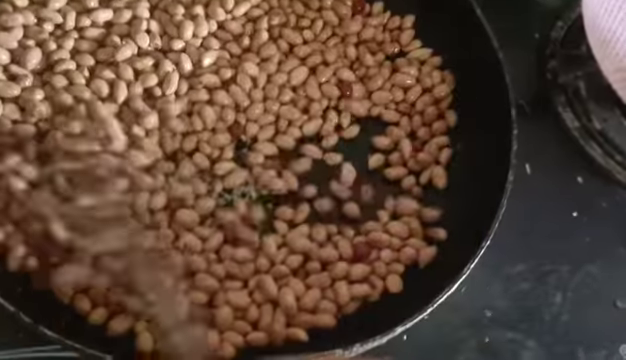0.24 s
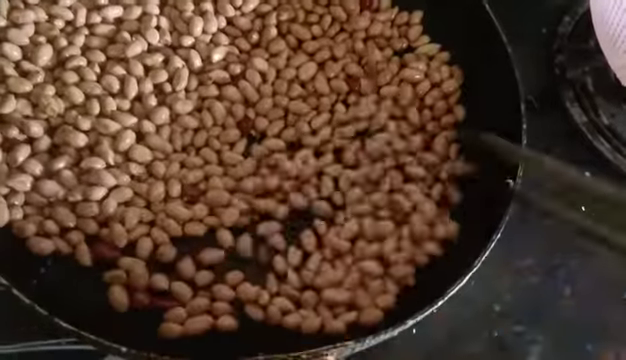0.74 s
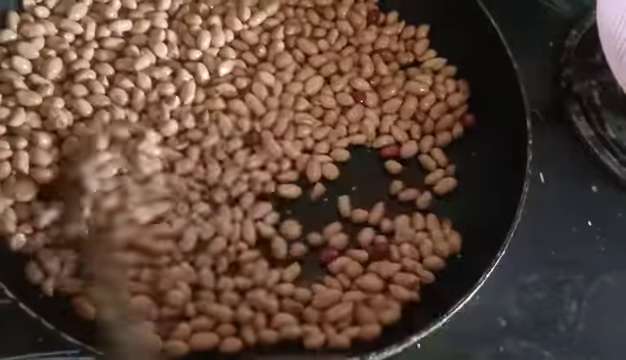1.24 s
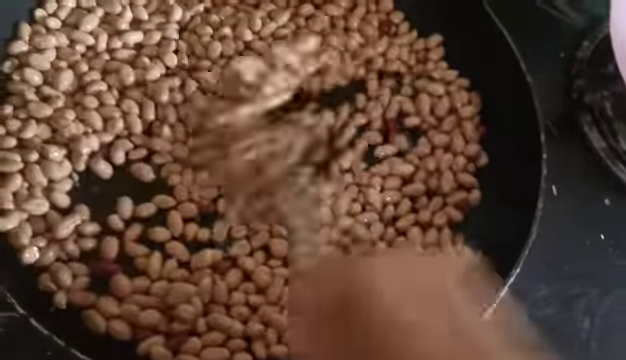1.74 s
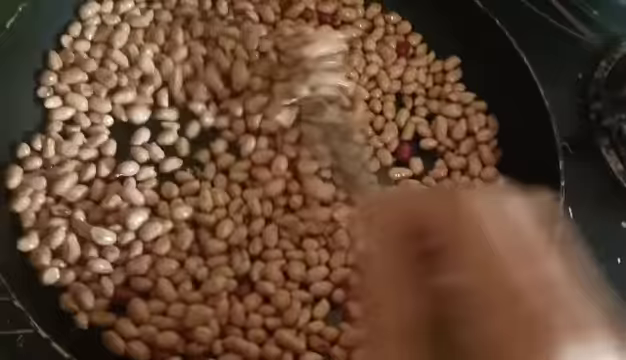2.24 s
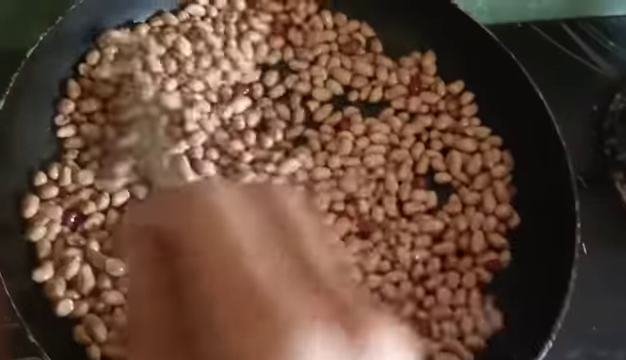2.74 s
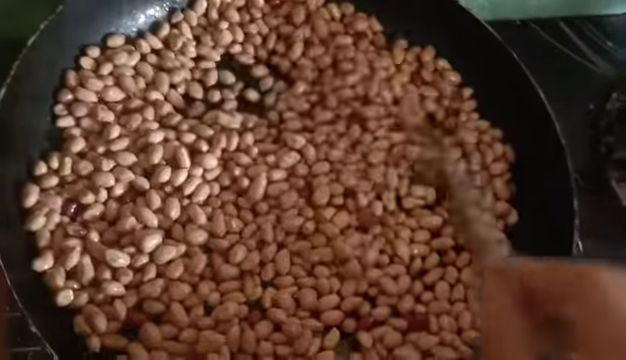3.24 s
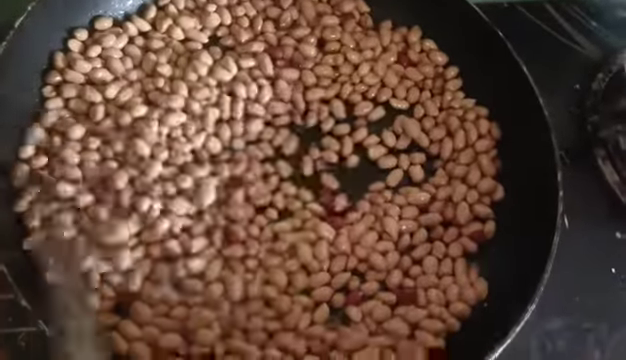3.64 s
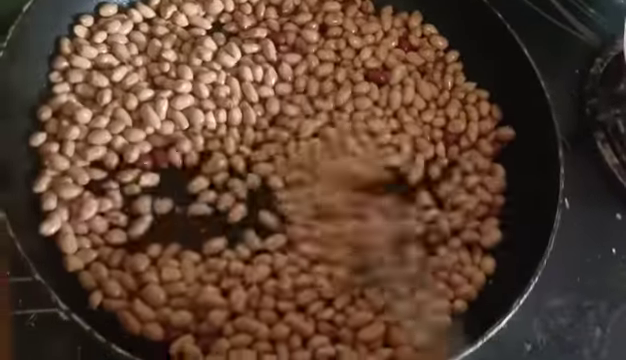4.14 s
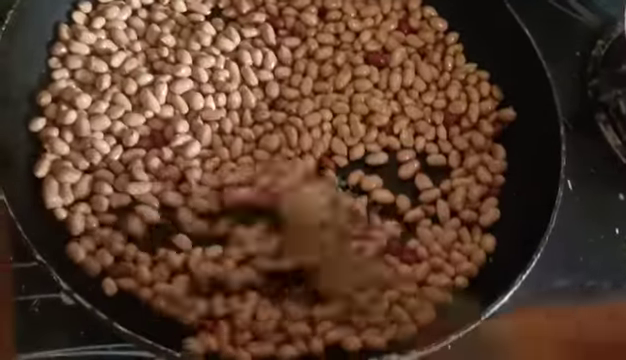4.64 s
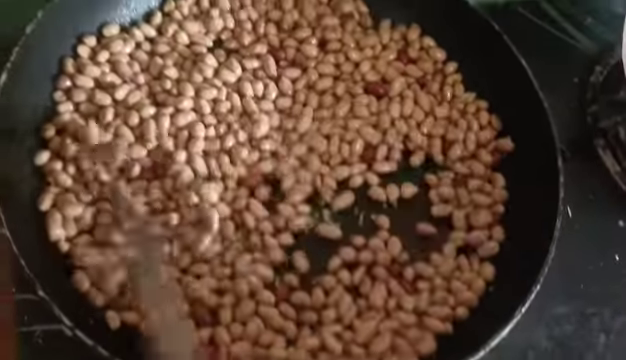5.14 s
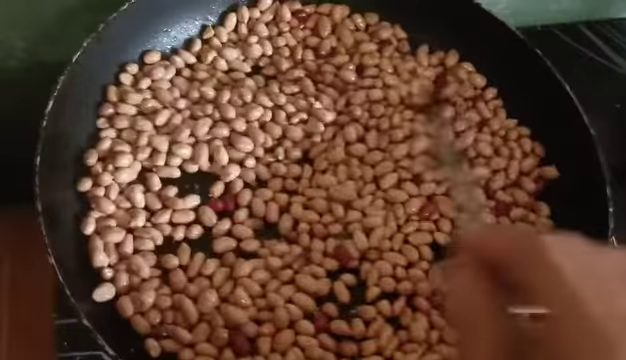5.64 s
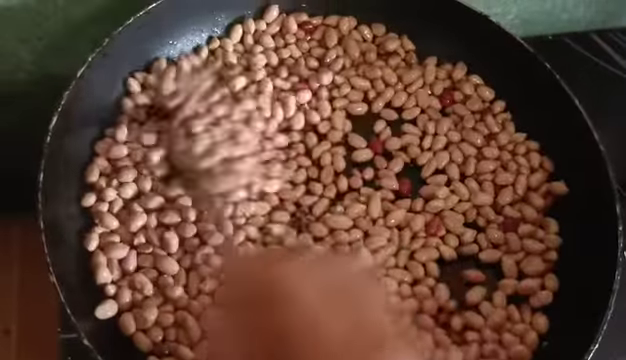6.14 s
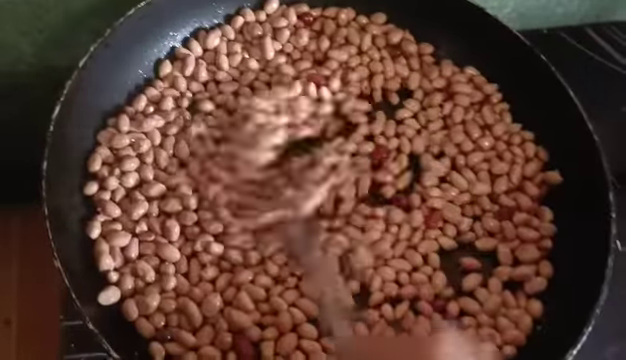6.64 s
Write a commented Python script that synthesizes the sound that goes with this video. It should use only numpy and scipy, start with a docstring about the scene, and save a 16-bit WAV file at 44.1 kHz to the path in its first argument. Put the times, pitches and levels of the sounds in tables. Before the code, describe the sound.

From the start, a metal spatula stirs peanuts in a hot frying pan, close up in a small kitchen with little echo. The sweeps come two or three times a second and last through all seven seconds. Each is a surge of dry, hollow rattling with a thin metallic scrape and a brief ring from the pan. The blade knocks irregularly, most clearly around 0.7, 1.3, 1.6, 3.3, 5 and 5.7 seconds, and the pan sometimes shifts on its stand with a low thump. Sharp, bright clicks stand out near 0.7, 2.6, 3, 4.2 and 5.3 seconds. Single nuts drop on bare metal with small taps, the clearest at about 3.6 seconds. Underneath, hot skins crackle over a faint, steady high sizzle, a little stronger after 2 seconds, and the burner keeps up a soft low rumble.

```python
"""Peanuts dry-roasting in a frying pan in a small kitchen, with a stereo microphone close by.
From the start the burner rumbles below, a metal spatula sweeps through the nuts and hot skins crackle.
With each sweep, two or three a second, the nuts tumble, the blade scrapes and the pan rings under them.
Soon there is a sharp click, a loose nut drops on bare metal, the blade knocks and the pan shifts
on its stand; all of these come back irregularly as the stirring goes on."""
import sys
import numpy as np
from scipy import signal
from scipy.fft import rfft, irfft
from scipy.io import wavfile
from scipy.ndimage import uniform_filter1d

SR = 44100
rng = np.random.default_rng(int(sys.argv[2]) if len(sys.argv) > 2 else 0)


def transcribe(signal):
    """Save signal, clipped to [-1, 1], as a 16-bit WAV file at the path in sys.argv[1]."""
    frames = np.atleast_2d(signal).T
    limited = np.clip(frames, -1, 1)
    pcm = np.round(limited * 32767).astype(np.int16)
    wavfile.write(sys.argv[1], SR, pcm)


N = 303136


def from_db(db):
    """Decibels to gain."""
    return 10 ** (np.asarray(db) / 20)


def rms_one(x):
    """Scale a stereo pair so that its centre has rms 1."""
    return x / np.sqrt(np.mean(x.mean(0) ** 2) + 1e-20)


def smooth(x, span_s):
    """A moving average, taken twice."""
    for _ in range(2):
        x = uniform_filter1d(x, int(span_s * SR) + 1)
    return x


def steady(x, even_s):
    """Hold the centre at rms 1 over spans longer than a single contact."""
    return x / np.sqrt(np.abs(smooth(x.mean(0) ** 2, even_s)) + 1e-20)


def in_time(rows):
    """A curve of (seconds, value) points at every sample."""
    return np.interp(np.arange(N) / SR, *np.transpose(rows))


def at_hz(points, hz):
    """Read a spectrum on a log-frequency axis."""
    f, value = np.transpose(points)
    return np.interp(np.log(np.maximum(hz, 1)), np.log(f), value)


def convolve(x, response):
    """Filter both sides, keeping the length."""
    return signal.oaconvolve(x, np.atleast_2d(response), axes=1)[:, :N]


def causal(spectrum, size=4096):
    """The minimum-phase impulse response of a spectrum: nothing sounds early."""
    hz = np.arange(size // 2 + 1) * SR / size
    cepstrum = irfft(np.log(from_db(at_hz(spectrum, hz))))
    cepstrum[1:size // 2] *= 2
    cepstrum[size // 2 + 1:] = 0
    return irfft(np.exp(rfft(cepstrum)))


def resonate(x, hz, width_hz):
    """A resonance with gain 1 on top."""
    r = np.exp(-np.pi * width_hz / SR)
    feedback = [1, -2 * r * np.cos(2 * np.pi * hz / SR), r * r]
    return signal.lfilter(np.array([1, 0, -1]) * (1 - r * r) / 2, feedback, x)


def at_random(per_s):
    """Moments in seconds, coming at a rate that may change."""
    return np.flatnonzero(rng.random(N) < per_s / SR) / SR


def contacts(per_s, spread_db, even_s):
    """Samples and sizes of random contacts, many small and a few large, their slow level evened out."""
    at = np.flatnonzero(rng.random(N) < per_s / SR)
    sizes = from_db(spread_db * np.minimum(rng.exponential(1, N), 4.5))[at]
    energy = smooth(np.bincount(at, sizes ** 2, N), even_s)
    return at, sizes / np.sqrt(energy[at])


def swells(starts, rises_s, lengths, peaks_db, settle_s, rest_db):
    """Level in dB of movements that rise, hold and settle; rise and settling times span 20 dB."""
    t, power = np.arange(N) / SR, from_db(rest_db) ** 2 * np.ones(N)
    for s, rise_s, length, db in np.broadcast(starts, rises_s, lengths, peaks_db):
        near = slice(max(int((s - 2 * rise_s) * SR), 0), int((s + length + 2 * settle_s) * SR))
        away = np.maximum(s - t[near], 0) / rise_s + np.maximum(t[near] - s - length, 0) / settle_s
        power[near] += from_db(db - 20 * away ** 1.35) ** 2  # round at the top, steep at the feet
    return 10 * np.log10(power)


# How alike the microphone's two sides are. Each row: frequency in Hz, likeness from 0 to 1.
STEREO_LIKENESS = [(100, .93), (400, 1), (600, 0.65), (800, 0), (1050, 1), (1500, 0), (2000, 0.52),
                   (3000, 0), (8000, 0.06)]
SIDES = np.array([[1], [-1]])  # left, right


def two_sides(draws, hz):
    """Mix two unrelated draws into left and right, as alike as they are at this pitch."""
    alike = np.clip(at_hz(STEREO_LIKENESS, hz), 0, 1)
    return np.sqrt(1 + alike) * draws[0] + np.sqrt(1 - alike) * draws[1] * SIDES


def low_noise(spectrum):
    """Stereo noise of a given colour, alike on both sides in the bass; rms 1."""
    bins = two_sides(rfft(rng.standard_normal((2, N))), np.arange(N // 2 + 1) * SR / N)
    return rms_one(convolve(irfft(bins, N), causal(spectrum)))


def strike(at, sizes, width_share, pitched_db, count=44):
    """Every contact rings many short modes and favours a chance few."""
    out, clicks = np.zeros((2, N)), 1e-12 * rng.standard_normal((2, N))
    for hz in np.geomspace(300, 15000, count):
        favour = from_db(pitched_db * np.clip(rng.standard_normal(len(at)), -2, 2))
        clicks[:, at] = sizes * favour * two_sides(rng.standard_normal((2, len(at))), hz)
        out += resonate(clicks, hz, width_share * hz)
    return out


def pings(times, peaks, pitches, t60):
    """One dying sine for each touch, reaching the two sides in different phase."""
    out, t = np.zeros((2, N + SR)), np.arange(int(t60 * SR)) / SR
    dying = from_db(-60 * t / t60)
    apart = (1 - at_hz(STEREO_LIKENESS, pitches)) * rng.uniform(-1.1, 1, len(times))
    for i, peak, hz, phase in zip((times * SR).astype(int), peaks, pitches, apart):
        attack = 1 - np.exp(-2 * hz * t)
        out[:, i:i + len(t)] += peak * attack * dying * np.sin(2 * np.pi * hz * t + phase * SIDES)
    return out[:, :N]


# The burner and the stand, just below the pan. Each row: frequency in Hz, level in dB.
BURNER_SPECTRUM = [(20, -6), (55, -5), (100, -3.5), (200, -9.5), (265, -1), (330, -14.5), (700, -8),
                   (2000, -11), (6000, -21.5)]
STAND_SPECTRUM = [(40, -9), (110, -16.5), (150, 0.5), (190, -7.5), (262, 1), (320, -6.5), (450, 0.5),
                  (800, -15), (2000, -21)]
# Shoves of the pan on its stand. Each row: time in seconds, level in dB.
PAN_SHOVES = [(0.41, -34.5), (2.02, -34.5), (2.42, -36), (3.66, -34), (4.5, -37.5), (6.1, -33.5),
              (6.53, -37)]


def rumbling():
    """The burner runs steadily; the pan grumbles on its stand when shoved."""
    s, shove_db = np.transpose(PAN_SHOVES)
    stand_db = swells(s, rises_s=.11, lengths=.01, peaks_db=shove_db, settle_s=.21, rest_db=-46)
    return from_db(-40) * low_noise(BURNER_SPECTRUM) + from_db(stand_db) * low_noise(STAND_SPECTRUM)


# The blade's sweeps, close to the microphone. Each row: start of full speed, rise and length in seconds;
# tumbling, brightness, brightening during the sweep, crackle of rubbed skins, the pan's low ring,
# its deep hollow tone and left over right, all in relative dB; lower and upper resonance in Hz.
BLADE_SWEEPS = [(0.011, 0.08, 0.078, -15, -1.0, 4.0, -36.0, 3.7, -28.0, -6.0, 1050.0, 1500.0),
                (0.372, 0.022, 0.02, -26.0, -3, -1.0, -31.5, -9.3, -15.0, -5.0, 1000.0, 1600.0),
                (0.492, 0.08, 0.1, -18, -4.5, 3.0, -36.0, -9.3, -21.0, -3.0, 1040.0, 1870.0),
                (0.812, 0.04, 0.088, -18.3, 0.7, -4.0, -32.0, -3.3, -27.0, -6, 1010.0, 1480.0),
                (1.232, 0.06, 0.1, -18.8, 2, 0.0, -30.0, 3.7, -22.0, -6.0, 1120.0, 1736.0),
                (1.645, 0.07, 0.076, -14.5, -1.2, 6.0, -32.0, -2.3, -23.0, -6.0, 1014.0, 1390.0),
                (2.09, 0.07, 0.11, -20.0, -1.2, -1.0, -29.5, 2.7, -23.0, -5.0, 790.0, 1446.0),
                (2.523, 0.08, 0.063, -14.7, -6.5, -1.0, -33.0, 0.7, -17.0, -3, 960.0, 1040.0),
                (2.926, 0.08, 0.068, -14.2, -6.5, 0.0, -28.0, -5.3, -25.0, -2.0, 880.0, 996.0),
                (3.287, 0.08, 0.043, -13.5, -1.5, 1.0, -26.0, -5.3, -13.0, -5.0, 965.0, 1290.0),
                (3.632, 0.022, 0.015, -27.0, 1.5, -3.0, -27.0, 1.7, -22.0, -4.0, 1000.0, 1400.0),
                (3.73, 0.08, 0.063, -16.0, -0.5, 2.0, -40.0, -2.3, -18.0, -4.0, 982.0, 1840.0),
                (4.069, 0.08, 0.07, -16.5, -1.1, -5.0, -28.5, 1.7, -25.0, -4.0, 1085.0, 1424.0),
                (4.537, 0.08, 0.096, -20, -2, 2.0, -37.0, -3.3, -25.0, -5.0, 1070.0, 1300.0),
                (4.874, 0.08, 0.071, -17, -1.5, 3.0, -30.0, -2.3, -26.0, -5.0, 1018.0, 1755.0),
                (5.272, 0.11, 0.124, -20.5, -0.3, 1.0, -31.0, 0.7, -13.0, -4, 1087.0, 1520.0),
                (5.707, 0.08, 0.056, -12.5, -5.5, 2.0, -45.0, 0.7, -14.0, -3.5, 936.0, 1320.0),
                (6.147, 0.08, 0.059, -14.5, -5.0, 2.0, -37.0, 2.7, -13.0, -2.0, 930.0, 1460.0),
                (6.509, 0.08, 0.044, -13.0, -4, 0.0, -32.0, -2.3, -15.0, -2.0, 970.0, 1290.0)]
MEAN_TUMBLE_DB = -18


def stirring():
    """The blade pushes through the heap, each sweep with its own force, colour and place."""
    s, rise_s, length, tumble_db, tone_db, brightening_db = np.transpose(BLADE_SWEEPS)[:6]
    ring_db, depth_db, place_db = map(per_sweep, np.transpose(BLADE_SWEEPS)[7:10])
    # a few nuts still roll in the pauses
    level_db = swells(s, rise_s, length, tumble_db, settle_s=.135, rest_db=-42.5)
    surges = smooth(rng.standard_normal(N), span_s=.04)  # the heap gives way unevenly
    level_db += .4 * surges / surges.std()
    dulling_db = .04 * (level_db - MEAN_TUMBLE_DB)  # a heavy push loads the pan
    bright_db = per_sweep(tone_db, brightening_db) - dulling_db
    stirred = tumbling(level_db, bright_db, ring_db, depth_db) + scraping(level_db, bright_db)
    lean = from_db(.5 * (place_db - place_db.mean()) * SIDES)
    return lean * (stirred + knocking())


def per_sweep(values, change=0):
    """A control that holds or drifts during each sweep and glides to the next in the pause."""
    s, _, length, *_ = np.transpose(BLADE_SWEEPS)
    return in_time(sorted(zip(np.r_[s, s + length], np.r_[values - change / 2, values + change / 2])))


def sweep_resonance(x, pitches, width_hz):
    """A resonance that takes a new pitch with each sweep, changing in the pauses."""
    s, _, length, *_ = np.transpose(BLADE_SWEEPS)
    pauses_s = (s[1:] + (s + length)[:-1]) / 2
    parts = np.split(x, (pauses_s * SR).astype(int), axis=1)
    return np.hstack([resonate(part, hz, width_hz) for part, hz in zip(parts, pitches)])


# Rattling nuts at close range. Each row: frequency in Hz, level in dB.
TUMBLE_SPECTRUM = [(200, -48), (350, -27.5), (500, -18), (700, -13), (1000, -0.5), (1400, 7.5), (1900, -1),
                   (2500, -7.5), (3200, -22.5), (4500, -23.5), (6000, -33.5), (9000, -35), (15000, -42)]


def tumbling(level_db, bright_db, ring_db, depth_db):
    """Nuts hit each other and the pan; a harder sweep makes more contacts and louder ones."""
    start_s, _, length, *_, lower_hz, upper_hz = np.transpose(BLADE_SWEEPS)
    force_db = level_db - MEAN_TUMBLE_DB
    hits = contacts(per_s=1100 * from_db(.5 * force_db), spread_db=3.5, even_s=.13)
    rattle = convolve(strike(*hits, width_share=.05, pitched_db=4), causal(TUMBLE_SPECTRUM))
    rattle = steady(rattle, even_s=.1)
    # nuts that land squarely on bare metal give a short hollow note near the sweep's resonances
    s = at_random(170 * from_db(.3 * force_db))
    lower_at, upper_at = (np.interp(s, start_s + length / 2, hz) for hz in (lower_hz, upper_hz))
    near_hz = np.where(rng.random(len(s)) < .55, lower_at, upper_at)
    peaks = from_db(rng.normal(0, 4.6, len(s)))
    notes = pings(s, peaks, near_hz * 2 ** rng.uniform(-.49, .465, len(s)), t60=.023)
    nuts = pan_rings(rattle + notes, ring_db)
    nuts = (nuts + from_db(-2.5) * sweep_resonance(nuts, lower_hz, width_hz=45)
            + from_db(-4) * sweep_resonance(nuts, upper_hz, width_hz=53))
    crossover = (signal.butter(3, 1250, kind, fs=SR, output="sos") for kind in ("low", "high"))
    body, clatter = (signal.sosfilt(np.vstack([sos, sos]), nuts) for sos in crossover)
    # the duller the sweep, the more the hollow of the pan sounds
    body = body + from_db(13.5 - np.maximum(bright_db, -9)) * resonate(body, hz=827, width_hz=850)
    deep = resonate(resonate(rattle, hz=520, width_hz=220), hz=520, width_hz=220)
    lows = from_db(3.5) * steady(body, even_s=.021) + from_db(depth_db) * steady(deep, even_s=.055)
    return from_db(level_db) * (lows + from_db(bright_db + 3) * steady(clatter, even_s=.048))


# The pan's long rings. Each row: frequency in Hz, gain in dB, time to fall 60 dB in seconds.
PAN_RESONANCES = [(260.6, 11, 0.68), (582, -4, 0.23), (689, 4, 0.5), (730.2, 13, .3), (927, -15, 0.26),
                  (1468, -16, 0.16), (1846, -2.5, 0.33), (2664, 2.5, 0.055), (3305, 11, 0.063)]


def pan_rings(x, low_db):
    """Contacts set the pan ringing; its low modes depend on how the blade bears on it."""
    low = x * from_db(low_db)
    return x + sum(from_db(db) * resonate(low if hz < 800 else x, hz, np.log(1000) / (np.pi * t60))
                   for hz, db, t60 in PAN_RESONANCES)


# Metal dragged over metal, close up. Each row: frequency in Hz, level in dB.
SCRAPE_SPECTRUM = [(2200, -9.5), (3300, 2), (4300, -2.5), (5200, -1.5), (6200, -3), (8000, -9.5),
                   (11000, -13)]


def scraping(level_db, bright_db):
    """The blade drags over the pan in slips, each ringing briefly at a high pitch of its own."""
    s = at_random(650 * from_db(.5 * (level_db - MEAN_TUMBLE_DB)))
    pitches = 2300 * 2 ** rng.uniform(0, 2.1, len(s))
    slips = pings(s, from_db(rng.normal(0, 4.6, len(s))), pitches, t60=.075)
    return from_db(1.26 * level_db + bright_db - 10) * convolve(slips, causal(SCRAPE_SPECTRUM))


# Hot skins across the pan. Each row: frequency in Hz, level in dB.
CRACKLE_SPECTRUM = [(1000, -20), (3000, -1), (4500, 2.5), (5700, 4.5), (8000, -5), (11000, -8),
                    (15000, 2.5)]
# Their crackle from heat alone. Each row: time in seconds, relative level in dB.
HEAT_CRACKLE = [(0.0, -33.5), (2.1, -35.5), (2.2, -30.5), (3.67, -30), (3.88, -34), (5.05, -32.5),
                (5.97, -37), (6.35, -29), (6.87, -32)]


def crackling():
    """Dry skins tick over a fine sizzle, and tick louder as each sweep rubs them."""
    s, rise_s, length, _, _, _, rubbed_db, *_ = np.transpose(BLADE_SWEEPS)
    level_db = swells(s, rise_s, length, rubbed_db, settle_s=.17, rest_db=in_time(HEAT_CRACKLE))
    colour = causal(CRACKLE_SPECTRUM)
    ticks = strike(*contacts(per_s=420, spread_db=4, even_s=.087), width_share=.045, pitched_db=.5)
    sizzle = rms_one(convolve(rng.standard_normal((2, N)), colour))
    return from_db(level_db - 7) * steady(convolve(ticks, colour), even_s=.24) + from_db(-44.5) * sizzle


# Sharp bright clicks during and between the sweeps. Each row: start in seconds, relative level in dB.
SHARP_CLICKS = [(0.0625, -10), (0.2633, -15), (0.7492, -4.5), (1.0045, -9), (1.1915, -8), (1.7664, -8),
                (2.586, -3.5), (2.987, 0), (3.5338, -8), (3.8584, -9), (4.1629, -1.5), (4.3157, -11.5),
                (4.6978, -7.5), (4.996, -14), (5.314, -5), (5.3532, -10), (5.9893, -11.5), (6.1719, -6),
                (6.3693, -7.5), (6.5816, -8)]
# Their tick at close range. Each row: frequency in Hz, level in dB.
CLICK_SPECTRUM = [(1000, -16), (3000, -9), (4500, 0), (5700, 2), (8000, -3), (15000, -14)]


def clicking():
    """A sharp click: a tiny bright ping with a dry tick. Smaller clicks come at random."""
    small_clicks = [(s, -16.5) for s in at_random(per_s=6)]
    s, level_db = np.vstack([SHARP_CLICKS, small_clicks]).T
    tick = strike((s * SR).astype(int), from_db(level_db - 3), width_share=.08, pitched_db=4, count=24)
    ping = pings(s, from_db(level_db - 7.5), rng.uniform(5120, 5940, len(s)), t60=.0099)
    return convolve(tick, causal(CLICK_SPECTRUM)) + ping


# Loose nuts falling back. Each row: start in seconds, relative level in dB, pitch in Hz.
NUT_DROPS = [(0.259, -18, 1500), (0.748, -20, 1080), (1.035, -18, 1020), (1.852, -24, 1450),
             (2.834, -18, 1330), (3.532, -21, 2090), (3.625, -10, 1440), (3.972, -20, 1080),
             (4.315, -24, 1450), (5.037, -15, 2260), (5.115, -17, 1840), (5.989, -18, 2290),
             (6.023, -28, 1170), (6.366, -24, 1360), (6.818, -18, 988)]
# The pan struck by a nut or the blade, close up. Each row: frequency in Hz, level in dB.
STRUCK_PAN_SPECTRUM = [(200, -44), (500, -19), (1000, 8), (1900, 7), (2800, -4.5), (4500, -3), (7000, -13),
                       (15000, -46)]


def dropping():
    """Single nuts land on bare metal: a short note and a dry tap."""
    s, level_db, hz = np.transpose(NUT_DROPS)
    tap = strike((s * SR).astype(int), from_db(level_db), width_share=.25, pitched_db=1, count=10)
    return pings(s, from_db(level_db - 1), hz, t60=.02) + convolve(tap, causal(STRUCK_PAN_SPECTRUM))


# The blade meets the pan, near the microphone. Each row: start in seconds, relative level in dB,
# main ring in Hz, relative thud in dB, hardness (higher gives more clank).
BLADE_KNOCKS = [(0.361, -17, 993, -31, -7), (0.559, -13, 1050, -51, -31), (0.661, -1.5, 1866, -31, -17.5),
                (0.806, -7, 1420, -35, -18), (0.917, -4, 1080, -44, -25), (1.1, -18, 1090, -44, -24),
                (1.326, -2, 1790, -40, -30), (1.632, -3.5, 999, -37, -23), (2.391, -6, 950, -26, -38),
                (2.899, -13, 890, -48, -18), (3.085, -14.5, 1700, -38, -19), (3.196, -17.5, 1170, -43, -12),
                (3.289, 0, 1157, -43, -23.5), (3.363, -1.5, 950, -45, -23), (4.152, -4.5, 735, -43, -11),
                (4.455, -6, 1880, -27, -11), (4.79, -10.5, 1100, -36, -16), (4.94, -7, 1860, -44, -29),
                (4.964, -2.5, 1820, -48, -19), (5.08, -14.5, 1320, -53, -17), (5.192, -9, 1007, -38, -12.5),
                (5.352, -8.5, 1870, -51, -10), (5.697, -3, 1046, -39, -40)]


def knocking():
    """The blade lands with a clunk and thumps the pan on its stand; a hard landing adds a clank."""
    s, level_db, ring_hz, thud_db, hardness = np.transpose(BLADE_KNOCKS)
    touches = np.arange(3)  # the blade chatters for a few milliseconds
    late_s = .0016 * touches * rng.uniform(.61, 1.3, (len(s), len(touches)))
    at = ((s[:, None] + late_s) * SR).astype(int).ravel()
    sizes = from_db((level_db + .64 * hardness)[:, None] - .83 * touches).ravel()
    chatter = strike(at, sizes, width_share=.034, pitched_db=1.5, count=30)
    clank = from_db(27) * convolve(chatter, causal(STRUCK_PAN_SPECTRUM))
    clunk = pings(s, from_db(level_db - .5), ring_hz, t60=.034)
    bounce = pings(s + .009, from_db(level_db - 12), ring_hz, t60=.028)
    hollow = sum(pings(s, from_db(level_db - 10), hz * rng.uniform(.914, 1.042, len(s)), t60=.052)
                 for hz in (800, 1100))
    pushes = np.bincount((s * SR).astype(int), from_db(thud_db), N) + 1e-12 * rng.standard_normal(N)
    thud = resonate(pushes, hz=264, width_hz=14) - .5 * resonate(pushes, hz=154, width_hz=19)
    ringing = pan_rings(clank + hollow, low_db=-9)  # the blade stays down and stills the low modes
    return ringing + clunk + bounce + from_db(52) * thud


def kitchen(x, t60=.11):
    """Reflections from near walls: a short diffuse tail, duller than the direct sound."""
    t = np.arange(int(.5 * SR)) / SR
    tail = rng.standard_normal((2, len(t))) * from_db(-60 * t / t60) * (t > .004)
    tail /= np.sqrt(np.sum(tail ** 2, axis=1, keepdims=True))
    return convolve(x, signal.sosfilt(signal.butter(1, 6000, fs=SR, output="sos"), tail))


def scene():
    """The stirred pan up close, the kitchen around it and the stove below."""
    pan = stirring() + crackling() + clicking() + dropping()
    return pan + from_db(-12) * kitchen(pan) + rumbling()


# The microphone's two ports, each with its resonance and notch. Each row: frequency in Hz, gain in dB.
LEFT_MIC_PORT = [(200, 0), (520, -5), (760, -6), (1080, -1.5), (1320, -3), (1900, -8), (3200, -2.5),
                 (4200, -1), (5600, -13), (6400, -16), (7000, -2.5), (8000, 3.5), (12000, -4.5),
                 (15000, -24)]
RIGHT_MIC_PORT = [(200, 1), (1000, 0), (1500, 2.5), (3000, 0), (3700, -1), (4500, 5.5), (5300, 12),
                  (6050, 11), (7000, -8), (9500, -22.5), (13000, -9), (15000, -12)]


def record(dry):
    """The ports colour each side, the loudest hits are rounded off by overload, the top is cut."""
    heard = convolve(dry, [causal(LEFT_MIC_PORT), causal(RIGHT_MIC_PORT)])
    heard = heard / (1 + heard ** 8) ** (1 / 8)
    return signal.sosfilt(signal.ellip(10, .1, 70, 15700, fs=SR, output="sos"), heard)


dry = scene()
out = record(dry)
transcribe(out)
```